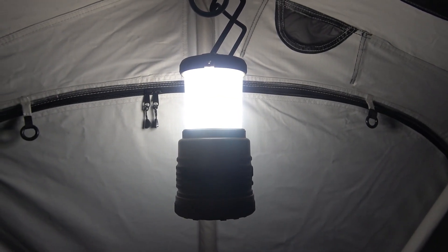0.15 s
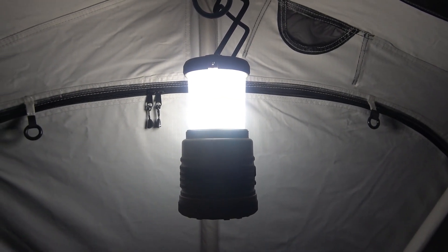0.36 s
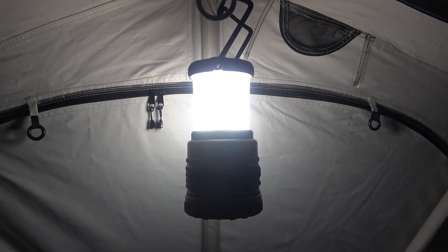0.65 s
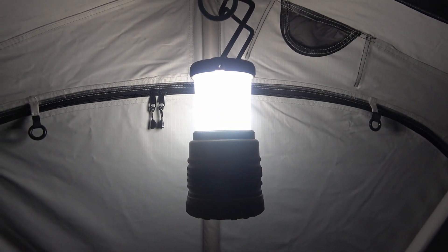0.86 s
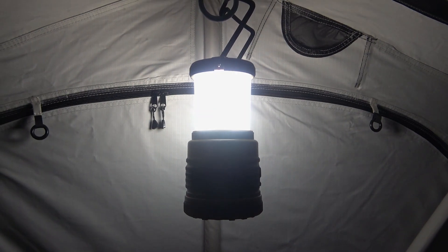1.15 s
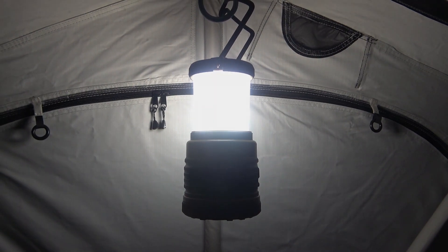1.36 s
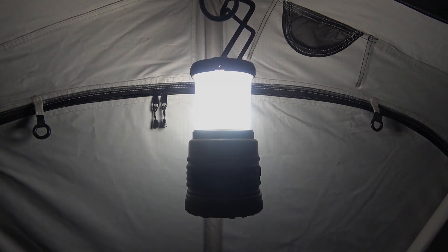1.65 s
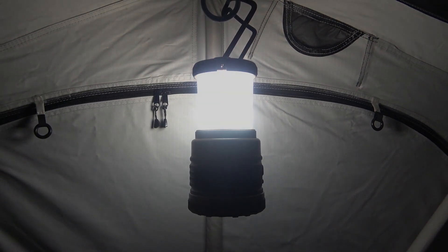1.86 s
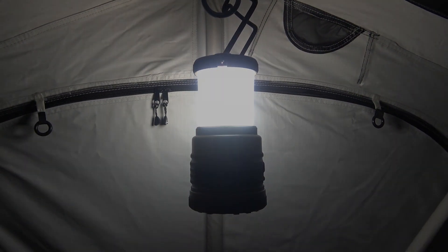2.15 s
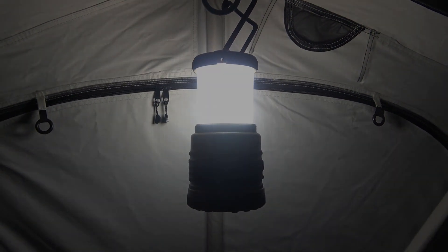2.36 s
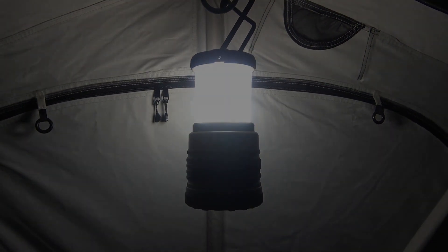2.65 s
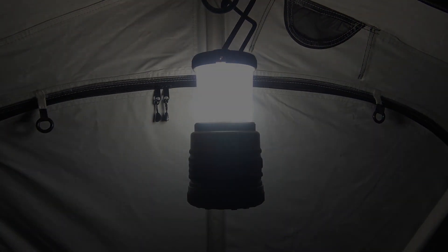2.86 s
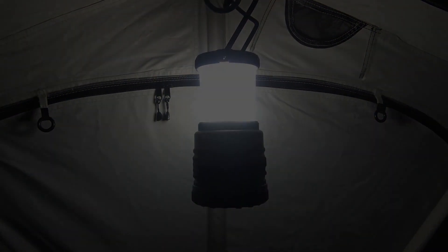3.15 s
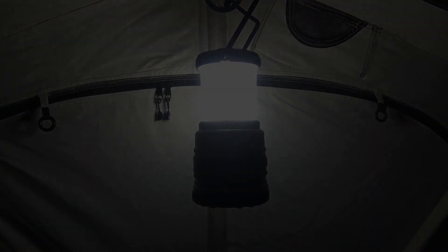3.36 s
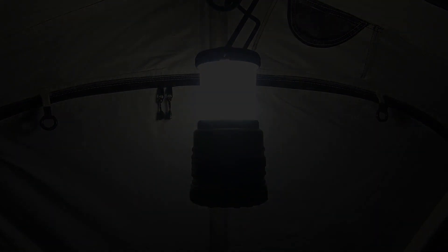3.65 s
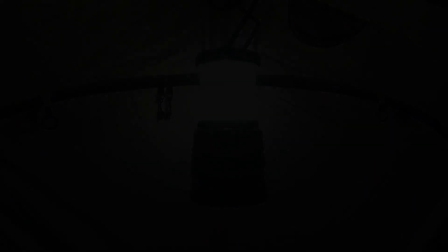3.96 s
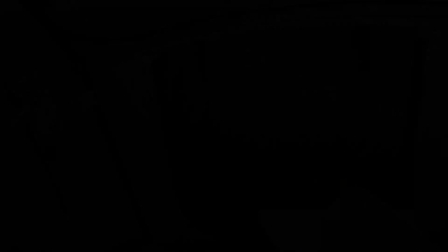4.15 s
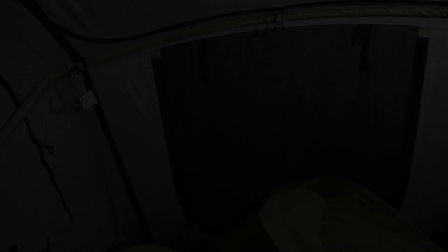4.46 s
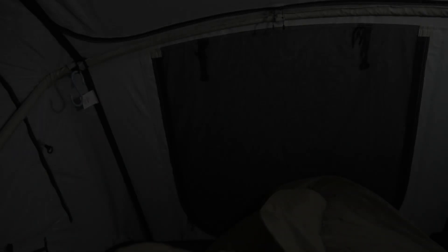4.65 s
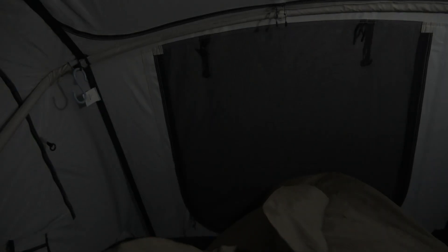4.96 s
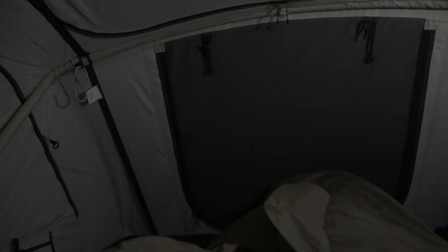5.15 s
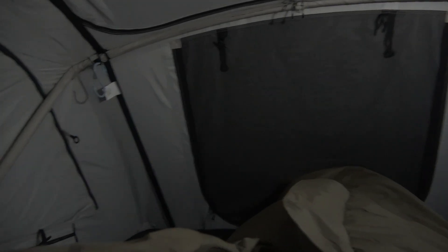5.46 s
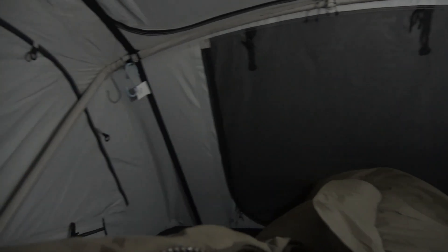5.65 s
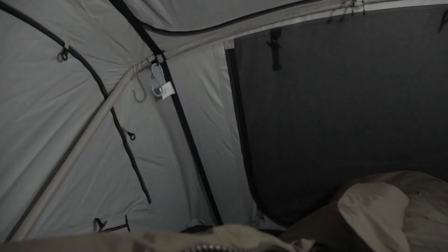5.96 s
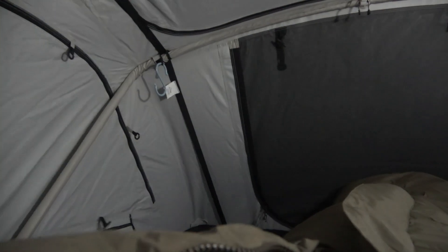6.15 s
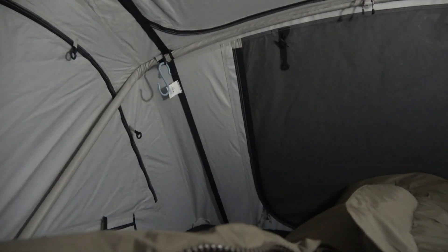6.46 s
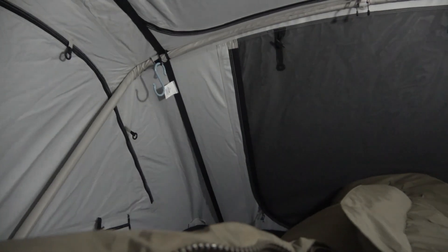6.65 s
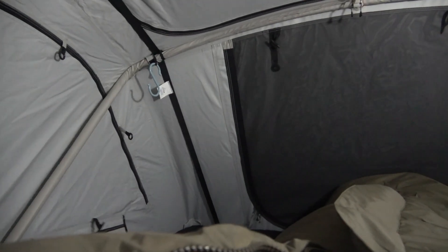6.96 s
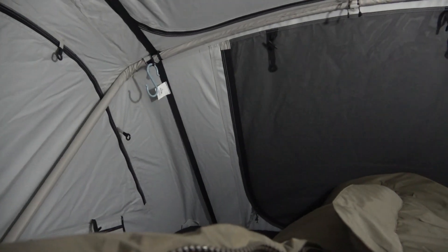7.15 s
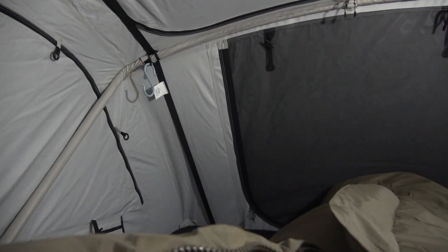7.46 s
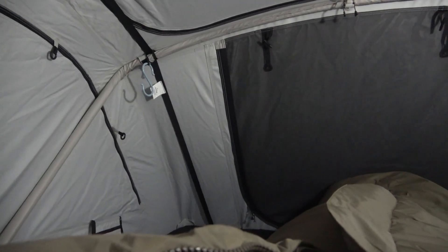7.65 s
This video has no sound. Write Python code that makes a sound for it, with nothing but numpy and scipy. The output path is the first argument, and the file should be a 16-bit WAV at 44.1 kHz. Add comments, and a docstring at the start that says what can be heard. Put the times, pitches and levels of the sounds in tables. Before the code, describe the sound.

Heard from inside a small tent: steady rain patter and low, uneven wind against the walls. Three hollow pole knocks come early, the third strongest, with drum-like thumps from the taut fabric. Just past four seconds a gust hits with a loud slap, and deep buffeting, sharp flapping and cloth rustle continue with small metal clinks. Near the end another heavy slap brings brief cord squeaks. One close microphone, slightly dull on top.

```python
"""Tent in a night storm

Wind buffets the walls as lumpy low noise and rain patters on them as brighter noise with clicks.
Loose cloth slaps and drags in bursts of coloured noise. A pole knocks, the taut wall thumps like a drum,
metal parts clink and cords squeak, all as short dying sines; zip pulls jingle more loudly in stronger wind.
One microphone hears it all, with rounded peaks and a limited treble."""
import sys
import numpy as np
from scipy import signal
from scipy.io import wavfile
from scipy.ndimage import uniform_filter1d

SR = 44100
rng = np.random.default_rng(int(sys.argv[2]) if len(sys.argv) > 2 else 0)


def digitize_waveform(pressure):
    """Quantize a signal to 16-bit integers and store it at the path in sys.argv[1].

    Rows of a 2-D input are taken as channels; values are limited to [-1, 1].
    """
    field = np.atleast_2d(pressure).T
    bounded = np.clip(field, -1, 1)
    quanta = np.round(bounded * 32767).astype(np.int16)
    wavfile.write(sys.argv[1], SR, quanta)


N = 344417

# Colours of moving cloth, its body, crack and fizz: (frequency [Hz], level [dB per Hz])
BODY_COLOUR = [(150, -25.5), (350, 2), (700, 2), (1400, 0), (2400, -8.5), (5000, -61)]
CRACK_COLOUR = [(900, 5.5), (2000, 23), (3700, 28), (5000, 16), (7000, -7), (16000, -58)]
FIZZ_COLOUR = [(3500, -36), (5500, -2.5), (10000, -12), (16000, -18)]


def amp(db):
    """Decibels to gain."""
    return 10 ** (np.asarray(db) / 20)


def evened(x):
    """Scaled to rms 1."""
    return x / np.sqrt(np.mean(x ** 2) + 1e-20)


def add(mix, s, sound):
    """Mixes a sound in at s seconds."""
    part = mix[max(round(s * SR), 0):][:len(sound)]
    part += sound[:len(part)]


def coloured(x, points):
    """Causal minimum-phase filter with the given spectrum; white noise keeps its level."""
    f, db = np.transpose(points)
    bins_hz = abs(np.fft.fftfreq(8192, 1 / SR))
    gain_db = np.interp(np.log(bins_hz + 1), np.log(f + 1), db)
    log_gain = gain_db * np.log(10) / 20
    taps = np.fft.ifft(np.exp(np.conj(signal.hilbert(log_gain)))).real[:4096]
    return signal.oaconvolve(x, taps / np.linalg.norm(taps))[:N]


def flicker(seconds, depth_db):
    """Random gain that changes about every so many seconds."""
    size = max(int(seconds * SR), 1)
    smooth = uniform_filter1d(uniform_filter1d(rng.standard_normal(N), size), size)
    return evened(amp(depth_db * evened(smooth)))


def puffs(per_s, spread_db, t30):
    """Envelope of random small impacts, mostly weak, each falling 30 dB in t30 seconds."""
    draw = rng.random(N)
    size = np.minimum(rng.exponential(1, N), 5)
    impact_power = amp(2 * spread_db * size) * (draw < per_s / SR)
    power_fall = amp(-60 / (t30 * SR))
    return signal.lfilter([1], [1, -power_fall], impact_power) ** .5


def snapping(per_s, spread_db):
    """Tiny creases snap: a dense train of single clicks, mostly weak."""
    sizes = amp(spread_db * np.minimum(rng.exponential(1, N), 4)) * rng.choice([-1, 1], N)
    return evened(sizes * (rng.random(N) < per_s / SR))


def ring(hz, db, t60, slack=0):
    """One dying mode; positive slack makes the pitch start high and sink, negative makes it rise."""
    t = np.arange(SR // 4) / SR
    bent_time = t + slack * (1 - np.exp(-t / 0.017))
    return amp(db - 60 * t / t60) * np.sin(2 * np.pi * hz * bent_time)


def soft_start(rise_s):
    """Rounded onset for a struck sound."""
    return 1 - np.exp(-np.arange(SR // 4) / SR / rise_s)


def storm_db(s):
    """Levels of buffeting, flapping, rain and spray at s seconds; flaps follow wind, spray follows rain."""
    # Course of the storm: (time [s], wind on the walls [dB], rain on the cloth [dB])
    storm = [(0.0, -29, -38.5), (0.5, -27, -34.5), (0.85, -31.5, -37.5), (1.6, -28, -38), (2.1, -28, -37.5),
             (2.4, -32, -42), (2.81, -30, -36.5), (3.13, -25.5, -35), (3.48, -27, -34.5),
             (3.83, -24.5, -33), (4.14, -26.5, -35.5), (4.3, -14.5, -34), (4.72, -14, -32.5),
             (5.15, -13.5, -31), (5.38, -11, -40.5), (5.62, -12.5, -30.5), (6.0, -9, -29),
             (6.2, -15, -32.5), (6.62, -14.5, -32.5), (6.98, -17.5, -38), (7.31, -16.5, -35.5),
             (7.81, -15.5, -34.5)]
    at, wind, rain = np.transpose(storm)
    wind, rain = np.interp(s, at, wind), np.interp(s, at, rain)
    flap = -28.5 + 0.8 * (wind + 20)  # dB at a wind of -20 dB, then dB per dB
    spray = -51.5 + (rain + 35)
    return wind, flap, rain, spray


def level(column):
    """One storm layer (1 buffeting, 2 flapping, 3 rain, 4 spray) as gain per sample."""
    return amp(storm_db(np.arange(N) / SR)[column - 1])


def buffeting():
    """Eddies push the walls in lumps; the whole tent heaves slowly below."""
    # Colours of the push and of the heave: (frequency [Hz], level [dB per Hz])
    push_colour = [(26, -36.5), (45, -5.5), (70, -1), (126, -0.5), (242, -8.5), (372, -14), (400, -20.5),
                   (520, -36), (880, -120)]
    heave_colour = [(10, -32), (24, -8), (40, 4), (60, -17), (120, -74)]
    heave_db = -13.5  # re buffeting
    push = level(1)
    slow_push = uniform_filter1d(push, SR // 2)
    heave = amp(heave_db) * slow_push * coloured(rng.standard_normal(N), heave_colour)
    lumps = rng.standard_normal(N) * flicker(0.028, 1.4)
    return heave + push * coloured(lumps, push_colour)


def cloth():
    """Small flaps, drops and spray share one patter over a smooth far wash; creases crackle on top."""
    # Colours of flapping, rain and spray: (frequency [Hz], level [dB per Hz])
    flap_colour = [(150, -22.5), (250, 0), (354, -1.5), (433, -0.5), (782, -7), (2000, -23.5), (2600, -46),
                   (4400, -120)]
    rain_colour = [(710, -5.5), (1200, 0.5), (2630, -3), (3480, 0.5), (3900, -1), (4780, -13.5),
                   (5500, -23), (7150, -43), (12100, -120)]
    spray_colour = [(3240, -26), (5500, -3), (9360, -10.5), (14000, -13.5), (16000, -21)]
    patter, own_flaps = evened(puffs(43, 1.4, 0.028)), evened(puffs(110, 2.4, 0.076))
    spatter, ticks = evened(puffs(38, 6.1, 0.031)), evened(puffs(96, 3.0, 0.014))
    # the constant in each sum is the steady wash
    flaps = evened(0.39 + 0.067 * patter + 0.55 * own_flaps) * flicker(0.026, 2.75)
    drops = evened(1.44 + 0.36 * patter + 0.14 * ticks) * flicker(0.013, 1.54)
    spray = evened(1.3 + .5 * patter + 0.21 * spatter + 0.48 * ticks)
    layers = ((2, flaps, .45 * snapping(250, 6.6), flap_colour),
              (3, drops, .3 * snapping(400, 4.3), rain_colour),
              (4, spray, .25 * snapping(200, 5.7), spray_colour))
    out = np.zeros(N)
    for column, shape, crackle, colour in layers:
        out += coloured(level(column) * shape * (rng.standard_normal(N) + crackle), colour)
    return out


def metal():
    """Metal parts clink and faintly jingle, one softly started mode each, under a very fast flicker."""
    # Single clinks: (time [s], part, level [dB])
    strikes = [(4.491, "hook", -30), (4.49, "tab", -44), (4.505, "tab", -39), (5.39, "pull", -35),
               (5.404, "tab", -39), (5.524, "pull", -42), (5.6, "pull", -36), (5.805, "pull", -37),
               (5.917, "pull", -35), (5.982, "pull", -33), (6.044, "tab", -35), (6.044, "pull", -32),
               (6.05, "hook", -32), (6.062, "tab", -34), (6.074, "tab", -35), (6.095, "pull", -24.5),
               (6.14, "tab", -40), (6.188, "tab", -35), (6.215, "tab", -41), (6.484, "pull", -38),
               (6.484, "ring", -43), (6.674, "pull", -29), (6.688, "pull", -37), (6.898, "tab", -44),
               (7.375, "ring", -48), (7.528, "ring", -42), (7.553, "ring", -40), (7.578, "tab", -38)]
    # Pitch of each metal part: part -> frequency [Hz]
    part_hz = {"hook": 5830, "pull": 7170, "ring": 10950, "tab": 13880}
    jingles_per_s, jingle_db, detune = 14, -25, 0.02  # level re wind; largest pitch offset as a share
    out, rise = np.zeros(N), soft_start(0.0022)
    for s, part, db in strikes:
        add(out, s, rise * ring(part_hz[part], db, 0.074))
    pitches = list(part_hz.values())
    for when, part, off, used in rng.random((120, 4)):
        if used < jingles_per_s * N / SR / 120:
            s = when * N / SR
            hz = pitches[int(part * len(pitches))] * (1 + detune * (2 * off - 1))
            add(out, s, rise * ring(hz, storm_db(s)[0] + jingle_db, 0.022))
    return out * flicker(.0012, 5.0)


def cord_squeaks():
    """Cords squeak as the wall is dragged tight: single modes gliding upward, roughened by a flicker."""
    # Squeaks: (time [s], final pitch [Hz], level [dB])
    squeaks = [(7.55, 2530, -25), (7.624, 2470, -21), (7.644, 2320, -18), (7.647, 3080, -14),
               (7.65, 4460, -29), (7.669, 1700, -16), (7.712, 2750, -17), (7.712, 1494, -17),
               (7.724, 3850, -20)]
    out, rise = np.zeros(N), soft_start(0.0022)
    for s, hz, db in squeaks:
        add(out, s, rise * ring(hz, db, 0.083, -0.002))
    return out * flicker(.002, 2.0)


def knocks():
    """A hollow pole rings in its modes."""
    # Blows on the pole: (time [s], level [dB])
    blows = [(0.528, -7), (1.476, -1), (2.078, 2.5)]
    # Modes of the pole: (frequency [Hz], level [dB re blow], t60 [s])
    pole = [(606, -17, 0.067), (1366, -23, 0.059), (1830, -39, 0.2), (2500, -24.5, 0.023)]
    out = np.zeros(N)
    for s, db in blows:
        add(out, s, sum(ring(hz, db + mode_db, t60) for hz, mode_db, t60 in pole))
    return out


def thumps():
    """The taut wall rings briefly in its drum modes, which start high as the stretched skin slackens."""
    # Drum blows: (time [s], overtones [dB], low modes [dB], base pitch [Hz], base t60 [s])
    blows = [(0.527, -34, -17, 136, 0.28), (1.484, -20, -18, 133, 0.11), (1.542, -23, -23, 201, 0.15),
             (1.601, -32, -16.5, 138.4, 0.25), (1.681, -30, -26, 166, 0.13), (1.83, -22, -23, 199, 0.1),
             (2.119, 0, -10.5, 124.6, 0.12), (2.968, -1, -8, 186, 0.047), (3.138, -5.5, -12, 102, 0.098),
             (3.363, -10, -13.5, 131, 0.046), (3.786, -14, -17, 100.4, 0.17), (4.179, -8, -11, 135.8, 0.21),
             (4.225, -1.5, -4.5, 180, 0.049), (7.598, -7, -7, 160.7, 0.083)]
    # Modes of the wall: (pitch [factor], level [dB re blow], t60 [factor])
    wall = [(.48, -8.5, 3.5), (0.718, -0.5, 1.9), (0.999, 9.5, 0.8), (1.6, 3, 0.64), (2.4, -0.5, 0.55),
            (3.1, -5, 0.87), (5.5, -14, 0.54), (8, -40, 0.27)]
    out, rise = np.zeros(N), soft_start(0.0024)
    for s, over_db, low_db, hz, t60 in blows:
        for factor, mode_db, longer in wall:
            blow_db = over_db if factor > 2 else low_db
            add(out, s, rise * ring(hz * factor, mode_db + blow_db, t60 * longer, 0.0028))
    return out


def drags():
    """Cloth dragged across itself: rough swells of crackle, fizz and body in the colours of a slap."""
    # Swells: (start [s], length [s], crackle [dB], body [dB])
    swells = [(2.878, 0.067, -38.5, -30.5), (2.96, .045, -29.5, -27), (4.158, 0.095, -39, -23),
              (4.49, .07, -35.5, -38), (4.688, 0.06, -25.5, -24), (5.651, 0.047, -25.5, -21),
              (5.259, 0.1, -27, -23), (5.336, .17, -33.5, -24), (5.987, 0.043, -35, -34),
              (6.502, .06, -33, -27), (6.569, 0.043, -31.5, -29), (7.6, 0.12, -29, -24),
              (7.695, 0.068, -27, -21.5)]
    fizz_db = -13.5  # re crackle
    crack, body = np.zeros(N), np.zeros(N)
    for s, length, crack_db, body_db in swells:
        swell = np.sin(np.pi * np.arange(0, length, 1 / SR) / length)
        add(crack, s, amp(crack_db) * swell)
        add(body, s, amp(body_db) * swell)
    rough = flicker(0.0034, 3.2)
    layers = (crack, CRACK_COLOUR), (crack * amp(fizz_db), FIZZ_COLOUR), (body, BODY_COLOUR)
    return sum(coloured(shape * rough * rng.standard_normal(N), colour) for shape, colour in layers)


def flutters():
    """Random small slaps whose strength follows the storm: rows of time [s], crack [dB], body [dB]."""
    per_s, spread_db = 22, 2.5
    crack_db, body_db = -2, -2.5  # re rain, re flapping
    when, crack, body, used = rng.random((200, 4)).T
    s = when * N / SR
    _, flap_db, rain_db, _ = storm_db(s)
    rows = np.c_[s, rain_db + crack_db - spread_db * np.log(1 - crack),
                 flap_db + body_db - spread_db * np.log(1 - body)]
    return rows[used < per_s * N / SR / len(s)]


def slaps():
    """Each slap is one snap as the cloth pulls tight, a burst of crackle and a fainter, longer rustle."""
    # Cloth slaps: (time [s], crack [dB], body [dB])
    big_slaps = [(0.0327, -19.5, -20.5), (0.0594, -21.5, -42), (0.7108, -28, -38), (0.7316, -24.5, -39),
                 (0.82, -26.5, -28.5), (1.074, -29.5, -24.5), (2.1172, -34, -16.5), (2.4912, -48, -41),
                 (2.9696, -19.5, -14), (2.9774, -24.5, -24), (2.9888, -23, -28), (3.0926, -25, -24),
                 (3.221, -20, -19.5), (3.3429, -24, -22), (3.712, -30, -32), (3.747, -23, -27),
                 (3.7983, -25.5, -24), (3.8286, -30, -23), (3.92, -27, -34), (4.0664, -24.5, -34),
                 (4.2221, -8, 3), (4.225, -17, -5), (4.3245, -30, -20), (4.3438, -30, -14),
                 (4.575, -30, -17), (4.581, -17.5, -15), (4.6452, -11, -7), (4.6853, -11, -12),
                 (4.6984, -11, -1.5), (4.7185, -22.5, -23), (4.7571, -21.5, -18), (4.797, -19, -21),
                 (4.942, -14, -15.5), (4.9893, -34, -9), (5.1276, -14, -19), (5.136, -23, -14),
                 (5.2215, -13, -31), (5.31, -30, -17), (5.3544, -28, -18), (5.4183, -22, -11),
                 (5.66, -15, -18), (5.7399, -25, -35), (5.787, -37, -13), (5.8344, -39, -30),
                 (5.904, -15.5, -8), (5.935, -31, -12), (5.984, -34, -27), (6.0154, -17, -26),
                 (6.121, -24, -29), (6.1558, -17.5, -7.5), (6.3195, -27, -11.5), (6.4855, -21, -11),
                 (6.708, -18, -6), (6.7373, -18, -16), (6.8135, -19, -12), (6.962, -28, -21),
                 (7.02, -33, -32), (7.2434, -46, -14.5), (7.3491, -24, -16), (7.407, -31, -37),
                 (7.432, -28, -42), (7.526, -28, -37), (7.5953, -14, -5), (7.6052, -16, -2),
                 (7.6495, -34, -22), (7.7134, -28, -17), (7.724, -21, -14), (7.7354, -24, -8)]
    t, out = np.arange(SR // 4) / SR, np.zeros(N)
    grain = flicker(0.0013, 3.3)
    s, crack_db, body_db = np.vstack([big_slaps, flutters()]).T
    harder_db, heavier_db = crack_db + 24, np.maximum(body_db + 20, 0)
    fizz_db = -38.5 + 1.05 * harder_db  # a harder crack fizzes more
    # a harder crack lasts slightly longer, a heavy body dies sooner
    base_t60 = 0.053 * np.exp(0.0034 * np.maximum(harder_db, -10) - 0.16 * heavier_db)
    # (colour, levels [dB], snap [dB re burst], decay speed [factor], rustle [dB re burst])
    layers = ((CRACK_COLOUR, crack_db, 9, 1.1, -12),
              (BODY_COLOUR, body_db, 14, 1.1, -12),
              (FIZZ_COLOUR, fizz_db, 10, 1.2, -10))
    for colour, peak_db, snap_db, speed, rustle_db in layers:
        power, snaps = np.zeros(N), np.zeros(N)
        for start, db, t60 in zip(s, peak_db, base_t60):
            fall_db = 60 * speed * t / t60
            burst = amp(-fall_db) ** 2
            rustle = amp(rustle_db - 0.26 * fall_db) ** 2
            add(power, start, soft_start(.001) * amp(db) ** 2 * (burst + rustle))
            add(snaps, start + 0.001045, amp([db + snap_db]))  # a single-sample click
        crackle = np.sqrt(power) * rng.standard_normal(N) * grain
        out += coloured(snaps + crackle, colour)
    return out


def scene():
    """All sources at one microphone."""
    background = buffeting() + cloth()
    fittings = metal() + cord_squeaks() + knocks()
    walls = thumps() + drags() + slaps()
    return (background + fittings + walls)[None]


def record(dry):
    """Peaks round off towards full scale; then a steep low-pass limits the treble."""
    edge_hz = 15900
    rounded = dry / (1 + dry ** 6) ** (1 / 6)
    low_pass = signal.firwin(511, edge_hz, window=("kaiser", 9), fs=SR)
    return signal.oaconvolve(rounded, low_pass[None], "same")


dry = scene()
out = record(dry)
digitize_waveform(out)
```